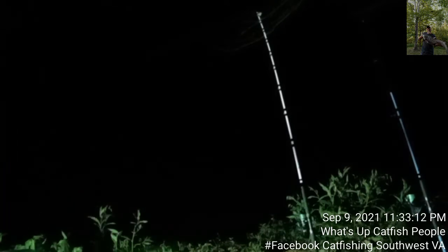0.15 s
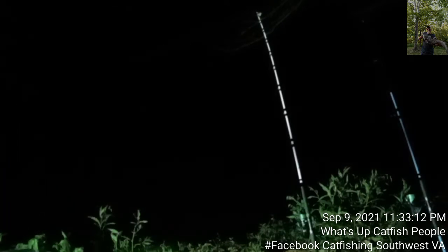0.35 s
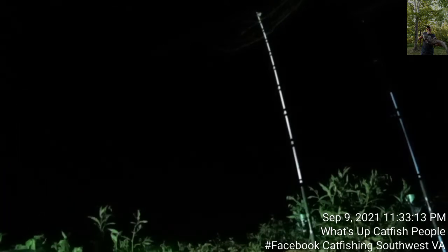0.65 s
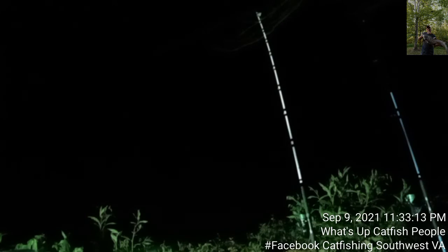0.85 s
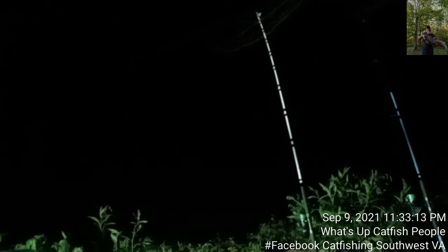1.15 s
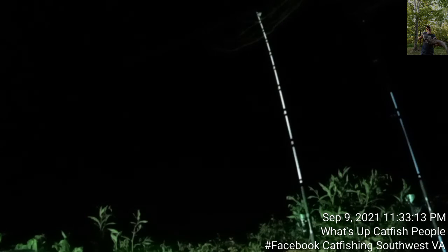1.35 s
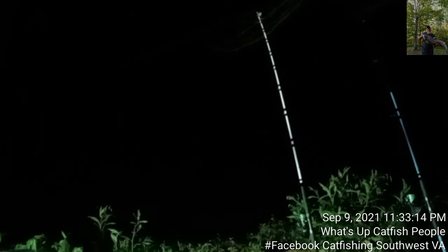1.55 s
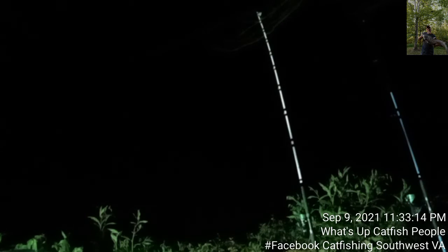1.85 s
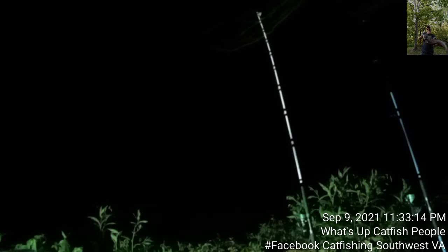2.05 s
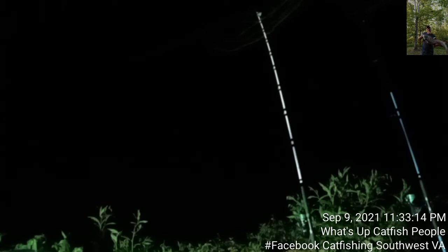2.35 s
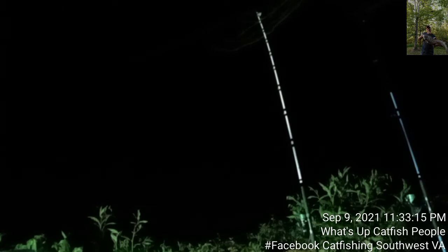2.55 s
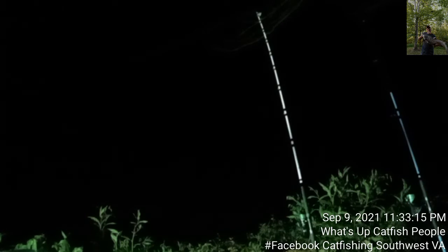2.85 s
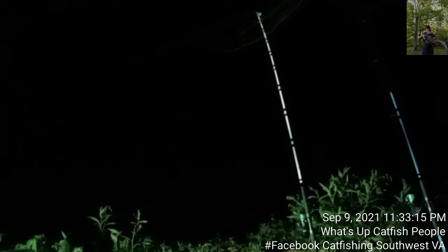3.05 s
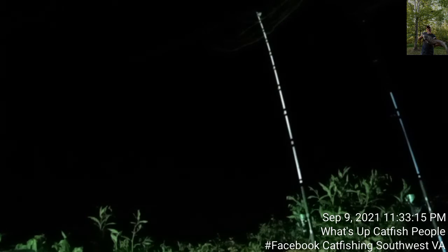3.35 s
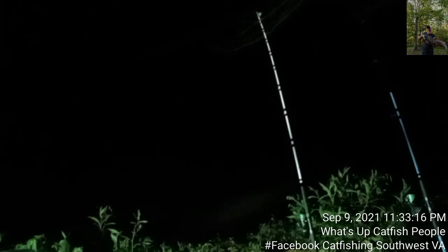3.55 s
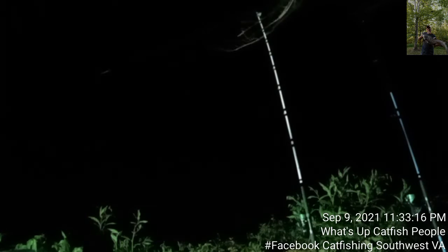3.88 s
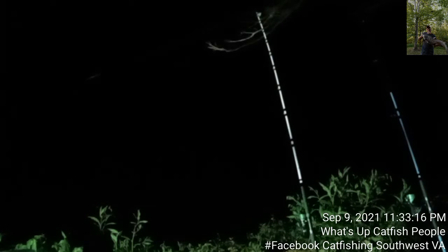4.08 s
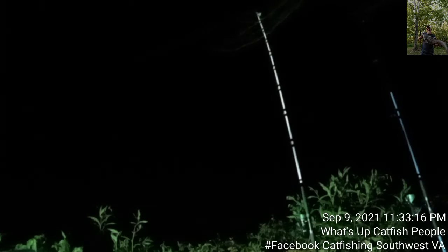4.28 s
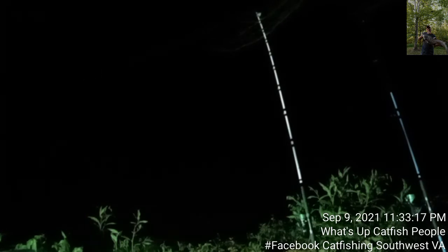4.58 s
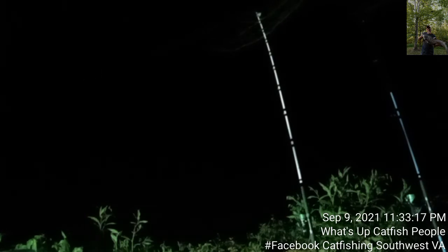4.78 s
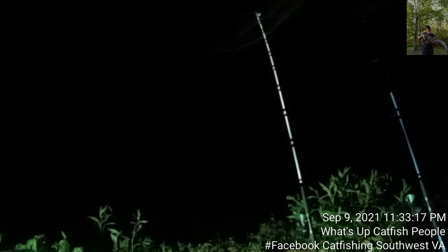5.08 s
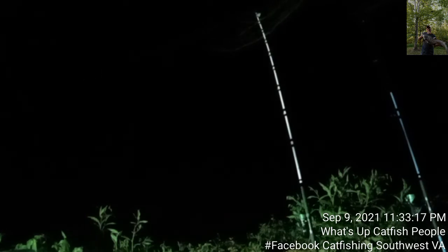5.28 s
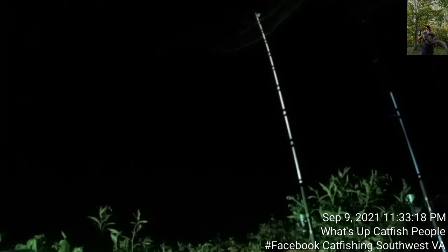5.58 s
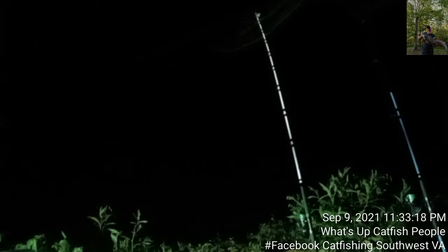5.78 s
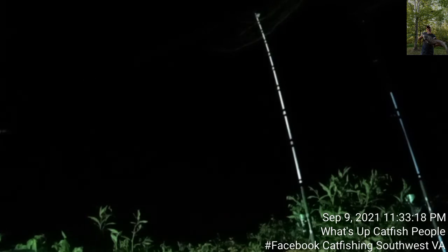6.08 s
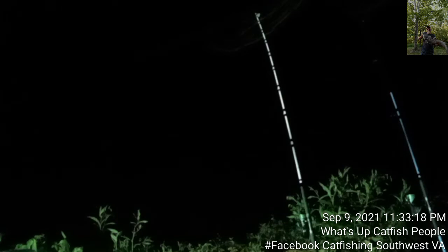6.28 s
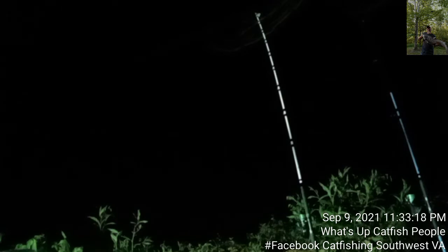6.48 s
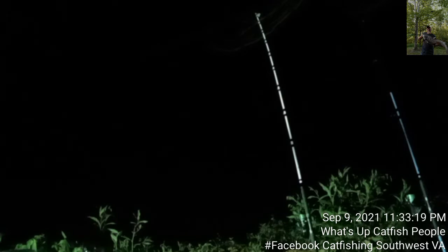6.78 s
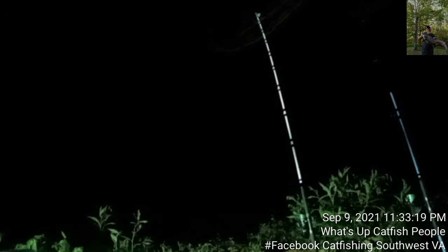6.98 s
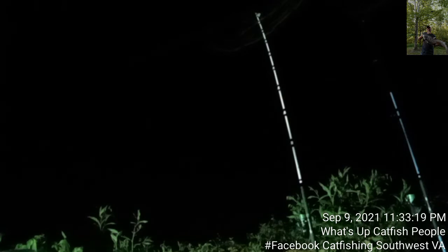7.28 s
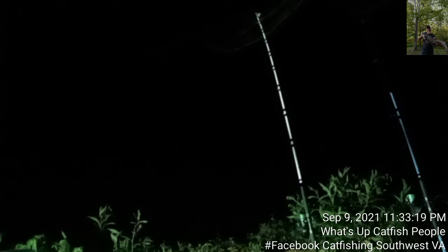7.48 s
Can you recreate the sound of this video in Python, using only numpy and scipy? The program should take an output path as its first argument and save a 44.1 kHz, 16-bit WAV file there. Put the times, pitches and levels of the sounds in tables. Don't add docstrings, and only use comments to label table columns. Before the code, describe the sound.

A steady chorus of crickets trills over a faint distant rumble on an open riverbank at night. Close to the stereo microphone, leaves rustle and crack briefly near one second. A katydid rasps on the left for a few seconds while the brush stays nearly still, then louder rustling returns with a twig snap, crisp crackles, cloth rubbing and soft hollow bumps until the end.

```python
import sys
import numpy as np
from scipy import signal
from scipy.fft import rfft, irfft
from scipy.io import wavfile

SR = 44100
rng = np.random.default_rng(int(sys.argv[2]) if len(sys.argv) > 2 else 0)


def dump_mix(stems):
    frames = np.atleast_2d(stems).T
    limited = np.clip(frames, -1, 1)
    pcm = np.round(limited * 32767).astype(np.int16)
    wavfile.write(sys.argv[1], SR, pcm)


def gain_from_decibels(decibels):
    exponent = np.asarray(decibels, float) / 20
    return 10 ** exponent


N = 336483
PORT_LAG = 8


def rms_one(x):
    return x / np.sqrt(np.mean(x ** 2) + 1e-20)


def in_time(rows):
    s, level_db = np.transpose(rows)
    return np.interp(np.arange(N) / SR, s, level_db)


def at_hz(points):
    hz = np.maximum(np.arange(N // 2 + 1) * SR / N, 1)
    table_hz, values = np.array(points).T
    return np.interp(np.log(hz), np.log(table_hz), values)


def colour(x, tone):
    closed = [(tone[0][0] * .8, -90)] + list(tone) + [(tone[-1][0] * 1.05, -90)]
    return irfft(rfft(x) * gain_from_decibels(at_hz(closed)), N)


def drift(rate):
    r = np.exp(-80 * np.pi * rate / SR)
    noise = rng.standard_normal(N // 40 + 2002)
    slow = signal.lfilter([1], [1, -2 * r, r * r], noise)[2000:]
    return np.interp(np.arange(N) / 40, np.arange(len(slow)), rms_one(slow))


def resonate(x, hz, width_hz):
    r = np.exp(-np.pi * width_hz / SR)
    b = (1 - r * r) / 2 * np.array([1, 0, -1])
    a = [1, -2 * r * np.cos(2 * np.pi * hz / SR), r * r]
    return signal.lfilter(b, a, signal.lfilter(b, a, x))


def ring(hz, t60, soft_s, rise):
    t = np.arange(int(SR * .15)) / SR
    turns = hz * t * (1 + rise * (t - .02))
    decay = gain_from_decibels(-60 * t / max(t60, .002))
    wave = np.sin(2 * np.pi * turns) * decay * (1 - np.exp(-t / soft_s))
    return wave / np.abs(wave).max()


def pan(left_right_db):
    return gain_from_decibels([[left_right_db / 2], [-left_right_db / 2]])


def add(track, s, wave):
    i = int(s * SR)
    track[..., i:i + wave.shape[-1]] += wave[..., :N - i]


def near(x, apart):
    right = np.sqrt(1 - apart) * np.roll(x[0], PORT_LAG) + np.sqrt(apart) * x[1]
    return np.array([x[0], right])


def bout(t, start, hold, rise_db_per_s, fall_db_per_s):
    before, after = np.maximum(start - t, 0), np.maximum(t - start - hold, 0)
    return -rise_db_per_s * before - fall_db_per_s * after


# frequency in Hz, density in dB per Hz.
NIGHT_LOW = [(15, -64), (25, -42), (70, -2.5), (174, -5), (205, -4), (273, -10), (316, -11.5), (438, -27),
             (596, -26.5), (920, -32.5), (1140, -33.5), (1700, -35), (1900, -31.5), (2470, -87),
             (4180, -120)]
# frequency in Hz, density in dB per Hz.
NIGHT_HIGH = [(2900, -15), (3080, -7.5), (4300, -16), (5900, -11), (7600, -9.5), (8600, -12), (10500, -17),
              (12000, -19.5), (13500, -20.5), (14500, -20), (15600, -27)]
# time in seconds, level in dB.
HAZE = [(0, 2), (.3, 0.5), (.7, -1), (1.5, 1.5), (3.9, 1), (4.05, -1), (4.2, 2), (4.5, 2), (6, 4),
        (7.63, 2.5)]
# frequency in Hz, likeness from 0 to 1.
LIKENESS = [(25, .8), (60, 1), (160, 0.85), (300, 0.74), (500, 0.31), (900, .05)]
# frequency in Hz, level in dB, start in seconds, end in seconds.
HUM = [(123.2, -64, -1, 9), (200.9, -61, -1, 9), (310, -69, -1, 9), (310, -64, 5.4, 6.9),
       (600, -73, 0.95, 3.0), (600, -81, -1, 3.5)]
HUM_WIDTHS_HZ = [36, 14, 18, 14, 34, 30]


def night():
    mid, side = rfft(rng.standard_normal((2, N)))
    alike = np.clip(at_hz(LIKENESS), 0, 1)
    pair = irfft(np.sqrt(1 + alike) * mid + np.sqrt(1 - alike) * side * [[1], [-1]], N)
    rumble_db = -54 + 1.7 * drift(14.6)
    haze_db = -54.5 + in_time(HAZE) + 1.26 * drift(5.8)
    out = gain_from_decibels(rumble_db) * rms_one(colour(pair, NIGHT_LOW))
    out += gain_from_decibels(haze_db) * rms_one(colour(pair, NIGHT_HIGH)) * pan(3)
    t = np.arange(N) / SR
    for (hz, db, start, end), width_hz in zip(HUM, HUM_WIDTHS_HZ):
        fade = np.clip(np.minimum(t - start, end - t) / .5, 0, 1)
        out += gain_from_decibels(db + 2.0 * drift(2.5)) * fade * rms_one(resonate(pair, hz, width_hz))
    return out


def choir(wings, level_db, pulses_per_s, depth, low_hz, high_hz):
    out = 0
    for hz, width_hz, db in wings:
        turns = np.cumsum(pulses_per_s * (1 + 0.0501 * drift(0.598))) / SR + rng.random()
        throb = 1 + depth * np.cos(2 * np.pi * turns)
        swell = gain_from_decibels(db + 1.54 * drift(3.8))
        out = out + swell * throb * rms_one(resonate(rng.standard_normal((2, N)), hz, width_hz))
    band = signal.butter(6, [low_hz, high_hz], "band", fs=SR, output="sos")
    return gain_from_decibels(level_db) * rms_one(signal.sosfilt(band, out))


# frequency in Hz, width in Hz, level in dB.
LOW_WINGS = [(2026, 245, -3.5), (2130, 138, 1.5), (2222, 96, -2), (2340, 103, -3)]
# frequency in Hz, width in Hz, level in dB.
MAIN_WINGS = [(3340, 890, -7.5), (3530, 160, -10.5), (3741, 156, -2.5), (3896, 116, -5.5), (4030, 430, -4)]
# frequency in Hz, width in Hz, level in dB.
HIGH_WINGS = [(4680, 860, 1), (4983, 330, 0.55), (5304, 290, -0.33)]
# time in seconds, level in dB.
SWELL = [(0.0, -52), (0.38, -52.5), (1.08, -53), (1.38, -53), (1.91, -53), (2.27, -52.5), (2.85, -54.5),
         (3.05, -52), (3.25, -51), (3.5, -52), (4.31, -53.5), (4.89, -52.5), (5.9, -54), (6.25, -50),
         (6.54, -52.5), (6.93, -53), (7.16, -54), (7.63, -53)]
# time in seconds, level in dB.
SOLO = [(0, -84), (.28, -60), (.36, -57.5), (.75, -58), (.9, -69), (3.3, -64), (3.5, -58), (3.9, -64),
        (4.1, -59.5), (7.63, -66)]


def crickets():
    low = choir(LOW_WINGS, -53.5, 90.0, 0.22, 1982, 2468)
    main = choir(MAIN_WINGS, 4.5 + in_time(SWELL), 38.5, 0.3, 3040, 4110)
    high = choir(HIGH_WINGS, -53, 46.0, 0.086, 4400, 5510)
    solo = choir([(7680, 600, 0)], in_time(SOLO), 45.0, .6, 7000, 8400)
    return low + main + high + solo


# frequency in Hz, density in dB per Hz.
KATYDID_TONE = [(6000, -27), (6500, 0.5), (7570, -31), (8200, -10), (9170, -11.5), (11500, -5.5),
                (13800, -7.5), (14600, -4), (15600, -13)]
# time in seconds, level in dB.
FAR_KATYDID = [(0, -58), (.25, -63), (.45, -66), (.8, -63), (1.3, -62), (1.6, -75), (4.35, -78),
               (4.47, -64), (4.6, -80), (7.63, -85)]
# frequency in Hz, density in dB per Hz.
FAR_KATYDID_TONE = [(11000, -10), (12500, -8), (13500, -2), (14500, -2), (15500, -4)]
# start in seconds, length in seconds, frequency in Hz, width in Hz,
# level in dB, left-right difference in dB.
CALLS_APART = [
    (0.522, 0.055, 12000, 4000, -51.5, 4),
    (0.772, 0.034, 12000, 4030, -50.5, 6),
    (1.168, 0.041, 12000, 4000, -48, -1),
    (2.376, 0.085, 8400, 1000, -45, 7),
    (2.47, 0.12, 8430, 1000, -46.5, 5),
    (3.73, 0.026, 9650, 90, -48, -2),
]


def katydid():
    start_s, stop_s, rise_s, fall_s = 1.36, 3.9, .11, .23
    strokes_per_s, tiring, spent_s = 18.74, .35, 4.02
    echo, echo_lag = .36, 68
    clock = np.arange(N) / SR
    level_db = -55.5 + bout(clock, start_s, stop_s - start_s, 28 / rise_s, 28 / fall_s)
    sag = tiring * (np.log(np.maximum(spent_s - clock, .01)) - 1)
    phase = (strokes_per_s * clock + sag) % 1
    stroke = .63 + np.sin(np.pi * phase ** 1.4) ** 3
    teeth = rms_one(colour(rng.standard_normal((2, N)), KATYDID_TONE) * stroke)
    teeth = rms_one(teeth - echo * np.roll(teeth, echo_lag, axis=1))
    out = gain_from_decibels(level_db) * teeth * gain_from_decibels([[2.5], [-4.5]])
    far = rms_one(colour(rng.standard_normal((2, N)), FAR_KATYDID_TONE))
    out += gain_from_decibels(in_time(FAR_KATYDID) + 1.5 * drift(20)) * far
    for s, length, hz, width_hz, db, pan_db in CALLS_APART:
        t = np.linspace(0, 1, int(length * SR))
        buzz = rms_one(resonate(rng.standard_normal((2, 9000)), hz, width_hz))[:, -len(t):]
        add(out, s, gain_from_decibels(db) * buzz * np.sin(np.pi * t ** 0.51) * pan(pan_db))
    return out


# time in seconds, peak in dB, frequency in Hz, left-right difference in dB.
CRACKS = [(.833, -43, 1320, 4), (.842, -38.5, 2600, 14), (.85, -42, 1700, 0), (.875, -40, 2800, 9),
          (1.02, -36.5, 2700, 12), (1.07, -42, 2500, 10), (.9774, -38, 1710, 1), (.9974, -31, 2090, 4),
          (1.003, -33, 1450, 2), (1.039, -34, 1610, 3), (1.046, -37, 1900, 5), (1.094, -40, 1510, 1),
          (1.135, -38, 8000, 0), (1.148, -46, 1400, -2), (1.18, -33.5, 2140, 8), (1.21, -45, 1390, 4),
          (4.639, -35, 5110, -1), (4.692, -42, 7500, -1), (4.7542, -32, 7500, -3), (4.785, -31, 7800, -4),
          (4.789, -25, 8200, -6), (4.899, -30, 6750, -2), (4.946, -21, 6940, 2), (5.043, -38.5, 1000, 3),
          (5.083, -33, 7680, -1), (5.104, -46, 990, 1), (5.196, -36, 1190, 1), (5.217, -30, 4500, 0),
          (5.39, -56, 780, 1), (5.45, -45, 400, 1), (5.321, -41.5, 1160, 1), (5.4881, -41.5, 940, 1),
          (5.504, -33, 10500, 0), (5.5545, -34, 1110, 1), (5.628, -36, 10400, 0), (5.656, -40.5, 1120, 1),
          (5.6906, -29, 8160, -3), (6.2966, -39, 1010, 2), (6.605, -30, 6820, -2), (6.623, -49, 1050, 1),
          (6.634, -35, 1810, 5), (6.68, -41, 1350, 3), (6.7224, -37.5, 1280, -1), (6.826, -38.5, 1450, 6),
          (6.885, -43, 1050, 1), (6.988, -52, 1160, 1), (7.047, -38, 955, 1), (7.0974, -21, 7880, -1),
          (7.139, -43, 600, -2), (6.563, -45, 740, 1), (6.857, -41, 715, 0), (7.351, -41, 840, 1),
          (.2239, -42, 9100, 0), (.7402, -35, 9200, 7), (.972, -34, 9800, 0), (.9867, -32, 8700, -4),
                 (1.0, -36, 9800, 0), (1.014, -37, 2100, 4), (1.027, -38, 1750, 3), (1.058, -40, 2200, 4),
                 (1.082, -38, 1900, 3), (.826, -37, 4600, 1), (1.007, -35, 8200, 0), (1.028, -35, 8000, 0),
                 (1.035, -36, 9600, 0), (1.05, -36, 8800, 0), (1.065, -39, 8300, 0), (1.187, -36, 8400, 0),
                 (1.4244, -36, 8700, 0), (1.493, -38, 9000, 2), (5.9359, -33, 9550, 0),
                 (6.7605, -25.5, 6500, 0), (6.7615, -33, 10500, 0), (6.884, -33, 4970, 0),
                 (4.757, -22, 8100, -6)]


def cracks():
    cycles, sharpness = 4.4, 3.5
    out = np.zeros((2, N))
    t = np.arange(900) / SR
    for s, db, hz, pan_db in CRACKS:
        burst = rng.standard_normal(len(t)) * np.exp(-t * hz / cycles)
        wave = resonate(burst, hz, hz / sharpness)
        add(out, s, gain_from_decibels(db + 1.5) * wave / np.abs(wave).max() * pan(pan_db))
    out[1] = np.roll(out[1], PORT_LAG)
    return out


# start in seconds, length in seconds, level in dB,
# first frequency in Hz, last frequency in Hz.
DRAGS = [(6.455, 0.038, -45, 906, 690), (6.549, 0.03, -43.5, 417, 760), (6.62, 0.057, -43, 787, 540),
         (6.822, .03, -50, 320, 420), (6.986, 0.058, -41, 286, 624), (7.032, 0.053, -42, 241, 350),
         (7.092, 0.083, -44, 410, 299), (7.103, 0.037, -44, 820, 600), (7.108, 0.078, -38.5, 252, 220),
         (7.127, 0.028, -40, 644, 400), (7.248, 0.041, -39.5, 287, 396)]


def drags():
    out = np.zeros((2, N))
    for s, length, db, from_hz, to_hz in DRAGS:
        u = np.linspace(0, 1, int(length * SR))
        turns = np.cumsum(from_hz + (to_hz - from_hz) * u) / SR
        catches = rng.standard_normal(12)
        stick = 1 + .79 * np.interp(u * length / 0.0081, np.arange(12), catches)
        add(out, s, gain_from_decibels(db - 1.0) * stick * np.sin(np.pi * u) ** 0.5 * np.sin(2 * np.pi * turns))
    out[1] = np.roll(out[1], PORT_LAG)
    return out


# time in seconds, peak in dB, low part in dB, left-right difference in dB.
TICKS = [(0.2922, -32.5, -31, -2), (0.8248, -28.5, -8, 2), (0.9844, -31.5, -11, 5), (1.1794, -37, -20, 4),
         (1.2365, -33, -16, 2), (1.398, -34, -22, -10), (1.493, -43, -13, 8), (1.932, -35, -34, -3),
         (1.956, -29, -32, -2.5), (2.946, -25.5, -35, -1), (3.053, -30, -33, 1), (1.964, -38, -35, -7),
         (4.55, -37, -6, -5), (4.7566, -36, -2, 16), (4.779, -28.5, -2, -3), (4.8517, -31, -6, -1),
         (4.9422, -27, -12, 1), (5.4843, -37, -20, 3), (5.5335, -35, -12, -6), (5.936, -34, -35, -1),
         (5.9746, -37, -28, -6), (6.0425, -40, -27, -6), (6.437, -34, -18, 6), (6.459, -36, -15, 4),
         (6.548, -39, -24, -1), (6.761, -27, -8, -2), (7.077, -26.5, -31, 5), (7.352, -32, -21, 5),
         (7.4294, -37, -27, 5), (.503, -44, -35, 0), (.894, -51, -25, 2), (1.36, -37, -21, 0),
         (1.945, -41, -35, 0), (4.0816, -43, -30, -1), (4.18, -46, -30, 0), (4.1979, -42, -28, 2),
         (4.471, -40, -25, -2), (4.4907, -43, -25, -1), (5.632, -33, -25, 0), (6.424, -37, -25, 0),
         (6.87, -44, -27, 0)]


def ticks():
    out = np.zeros((2, N))
    t = np.arange(400) / SR
    for s, db, low_db, pan_db in TICKS:
        hz = 7800 * (1 + .04 * rng.standard_normal())
        crack = rng.standard_normal(len(t)) * np.exp(-t / 0.0011) * (1 - np.exp(-t / 0.0005))
        top = resonate(crack, hz, 1700)
        body = resonate(crack, 1700, 1300)
        wave = top / np.abs(top).max() + gain_from_decibels(low_db + 4.0) * body / np.abs(body).max()
        add(out, s, gain_from_decibels(db + 5.0) * wave * pan(pan_db))
    out[1] = np.roll(out[1], PORT_LAG)
    return out


# frequency in Hz, level in dB, 60 dB decay in seconds.
SNAP = [(1320, -24, 0.003), (1880, 1.5, 0.0053), (2280, -9, 0.004), (3400, -22, .003), (4700, -14, 0.004),
        (6800, -12, .003), (8200, -12, 0.004), (9800, -20, 0.0027), (13500, -21, .002)]


def snap():
    out = np.zeros((2, N))
    for hz, db, t60 in SNAP:
        add(out, 4.7578, gain_from_decibels(db - 12) * ring(hz, t60, 0.00017, 0) * pan(1.5))
    out[1] = np.roll(out[1], PORT_LAG)
    return out


# time in seconds, peak in dB, frequency in Hz.
BUMPS = [(1.012, -29.5, 260), (4.385, -52, 225), (4.56, -34.5, 576), (4.915, -31.5, 312),
         (4.965, -33.5, 346), (4.988, -34, 294), (5.035, -34, 310), (5.252, -25.5, 337), (5.312, -31, 300),
         (5.478, -31.5, 317), (5.51, -37, 282), (5.562, -22.5, 310), (5.843, -39, 302), (6.502, -32, 263),
         (6.555, -30.5, 412), (6.655, -27.5, 535), (6.74, -31.5, 443), (6.758, -36, 245), (6.788, -30, 420),
         (6.853, -29.5, 384), (6.988, -28, 255), (7.009, -35.5, 527), (7.069, -33, 330), (7.097, -32, 310),
         (7.137, -33, 233), (7.209, -29.5, 403), (7.268, -32, 364), (7.292, -30, 424)]
# time in seconds, peak in dB, frequency in Hz.
TAPS = [(.882, -45.5, 830), (1.06, -34.5, 590), (1.089, -37, 556), (1.135, -48, 910), (1.486, -49, 1060),
        (3.799, -57, 970), (4.579, -31, 713), (4.888, -32, 703), (5.119, -37, 790), (5.196, -26.5, 794),
        (5.556, -30, 780), (6.058, -49, 820), (6.095, -44, 1200), (6.225, -45, 800), (6.335, -43, 600),
        (6.395, -46, 520), (5.648, -35, 704), (6.259, -39.5, 646), (6.296, -34.5, 646), (6.384, -40, 970),
        (6.47, -37.5, 733), (6.636, -34, 690), (7.482, -34, 976)]


def bumps():
    overtone, overtone_db = 1.63, -11.5
    out = np.zeros((2, N))
    for rows, t60 in (BUMPS, 0.045), (TAPS, 0.043):
        for s, db, hz in rows:
            low = ring(hz, t60, 0.0029, 3.3)
            high = ring(overtone * hz, t60 / overtone, 0.0014, 3.6)
            add(out, s, gain_from_decibels(db - 5.5) * (low + gain_from_decibels(overtone_db) * high))
    add(out, 5.56, gain_from_decibels(-32) * ring(154, 0.097, 0.0065, 0))
    out[1] = np.roll(out[1], PORT_LAG)
    return out


def grains(per_s, spread_db, hiss):
    born = rng.random((2, N)) < per_s * gain_from_decibels(4.0 * drift(14)) / SR
    sizes = gain_from_decibels(spread_db * np.minimum(rng.exponential(1, (2, N)), 4.5))
    signs = rng.choice([-1, 1], (2, N))
    return rms_one(born * sizes * signs) + hiss * rng.standard_normal((2, N))


def crumple(clicks, tone, sharpness, count):
    dealt = rng.integers(0, count, N)
    folds = 0
    for k, hz in enumerate(np.geomspace(tone[0][0], tone[-1][0], count)):
        folds = folds + resonate(clicks * (dealt == k), hz, hz / sharpness) / np.sqrt(hz)
    return rms_one(colour(folds, tone))


def piled(rows, fall_db_per_s, rise_db_per_s=700):
    t = np.arange(0, N + 64, 64) / SR
    power = 0
    for s, hold, db in rows:
        power = power + gain_from_decibels(2 * (db + bout(t, s, hold, rise_db_per_s, fall_db_per_s)))
    return np.interp(np.arange(N) / SR, t, np.sqrt(power))


# start in seconds, hold in seconds, leaf level in dB,
# weight (cloth against leaves) in dB.
MOVES = [(0.821, 0.015, -47.5, -12), (0.877, 0.14, -54, -17), (0.988, 0.086, -47.5, -5),
         (1.135, 0.15, -51.5, -11.5), (1.38, 0.022, -51, -17), (1.46, 0.086, -61, -10),
         (3.728, 0.12, -67.5, -4), (4.314, 0.1, -63, -4.5), (4.563, 0.077, -48.5, -3),
         (4.622, .13, -52.5, -1), (4.751, 0.015, -43, -4), (4.8, 0.32, -43, -6), (5.117, 0.068, -42.5, -8),
         (5.217, 0.038, -38, -14), (5.306, 0.089, -43, -9.5), (5.425, 0.094, -48, -6),
         (5.548, 0.063, -46, -11), (5.624, 0.14, -51, -2.5), (5.826, 0.24, -52.5, -4),
         (6.113, 0.19, -53, -12.5), (6.295, 0.018, -56, -7), (6.38, 0.016, -53, -2.5),
         (6.455, 0.027, -50, -9), (6.53, 0.059, -54.5, -16), (6.608, 0.1, -46.5, -4),
         (6.915, .05, -50, -13), (6.763, 0.13, -46.5, -3), (6.982, 0.13, -45.5, -5.5),
         (7.087, 0.087, -47.5, 1), (7.225, 0.14, -50, -3.5), (7.37, 0.056, -48.5, -7),
         (7.493, 0.08, -57.5, -6.5)]
# frequency in Hz, density in dB per Hz.
LEAF_TONE = [(1410, -11.5), (2400, -8.5), (3210, -8), (3780, -6.5), (5640, -5), (8080, -0.5), (9230, -5),
             (11000, -10), (13900, -16.5), (14600, -22), (15500, -35)]
# frequency in Hz, density in dB per Hz.
CLOTH_TONE = [(500, -9.5), (800, -0.5), (1300, -1), (2000, -4), (3000, 3), (4500, -35)]
# frequency in Hz, density in dB per Hz.
BUMP_TONE = [(90, -4.5), (200, -12.5), (350, 2), (600, -1), (900, -3.5), (1400, -19)]


def rustle():
    touches, rubs, loads = [], [], []
    for s, hold, db, weight_db in MOVES:
        touches.append((s, hold, db))
        rubs.append((s, hold, db + weight_db))
        ground_db = -50.5 + 1.34 * (db + 48) + weight_db
        loads.append((s + 0.0083, hold, ground_db))
    rubs += [(s, 0.0038, db - 18) for s, db, _ in TAPS]
    loads += [(s, 0.0088, db - 18.5) for s, db, _ in BUMPS]
    crackle = rms_one(colour(grains(1500, 3.2, .75) * gain_from_decibels(1.2 * drift(40)), LEAF_TONE))
    folds = crumple(grains(1300, 4.0, 0.99), CLOTH_TONE, 2.5, count=8)
    soil = crumple(grains(350, 4.8, 1.0), BUMP_TONE, 2.28, count=10)
    leaves = gain_from_decibels(4.5) * piled(touches, 120) * near(crackle, 0.99)
    cloth = gain_from_decibels(2.5) * piled(rubs, 187, 454) * near(folds, 0.58)
    ground = gain_from_decibels(2.5) * piled(loads, 256) * near(soil, 0.074)
    return leaves + cloth + ground


def scene():
    brush = cracks() + drags() + ticks() + snap() + bumps() + rustle()
    return night() + crickets() + katydid() + brush


def roll_off(x):
    return signal.sosfilt(signal.butter(12, 15780, fs=SR, output="sos"), x)


# frequency in Hz, left-right difference in dB.
LEFT_LEAD = [(60, 4), (300, 3.5), (700, 1.5), (3000, 1.5), (5500, 3.0), (8200, -7), (10500, 3.5),
             (15000, -0.5)]


def record(dry):
    lead = gain_from_decibels(at_hz(LEFT_LEAD) / 2)
    top = gain_from_decibels(at_hz([(14600, 0), (15200, -2), (15600, -8), (15900, -30)]))
    mix = irfft(rfft(dry) * top * [lead, 1 / lead], N)
    return roll_off(mix)


dry = scene()
out = record(dry)
dump_mix(out)
```